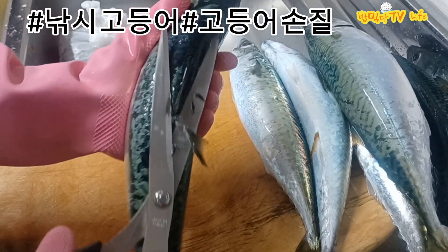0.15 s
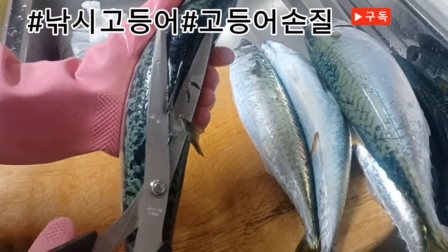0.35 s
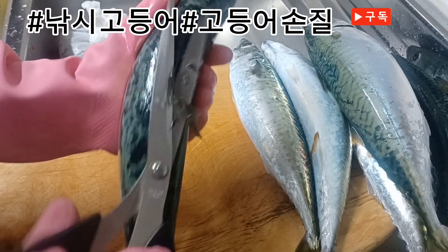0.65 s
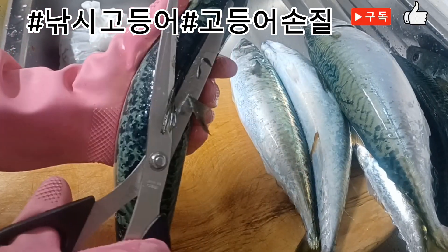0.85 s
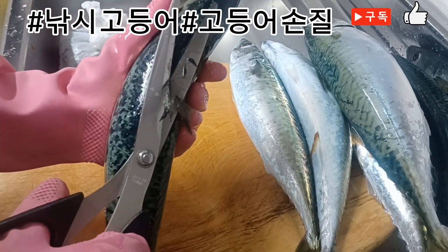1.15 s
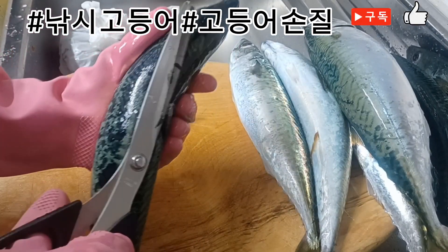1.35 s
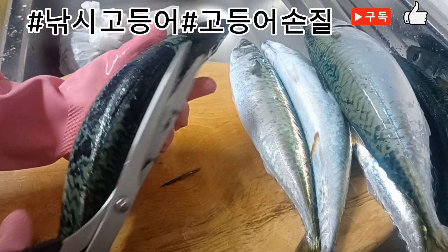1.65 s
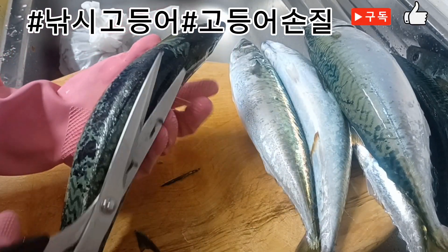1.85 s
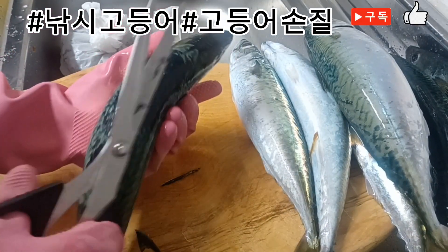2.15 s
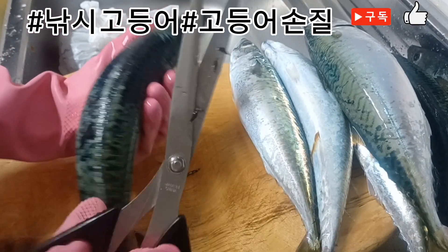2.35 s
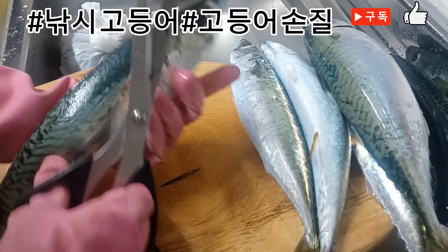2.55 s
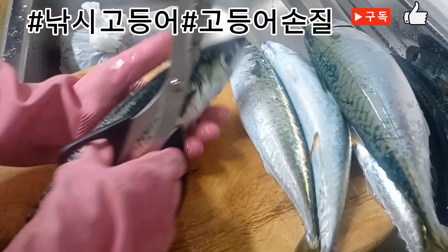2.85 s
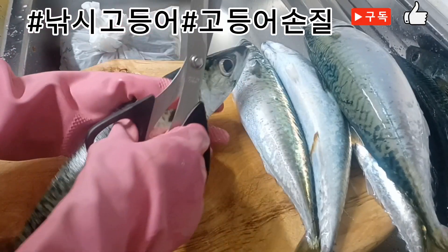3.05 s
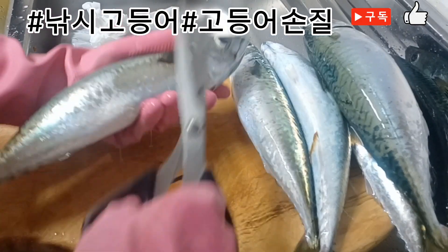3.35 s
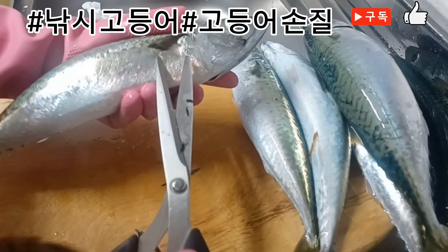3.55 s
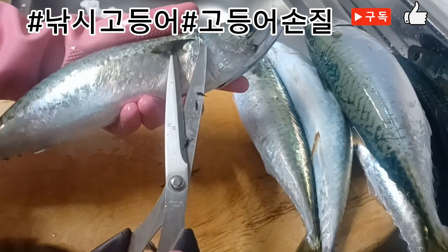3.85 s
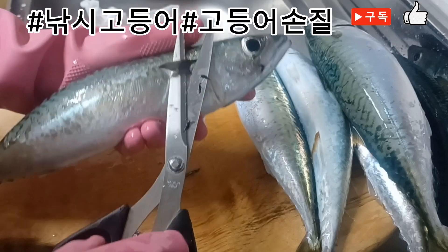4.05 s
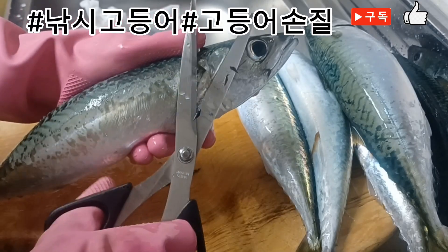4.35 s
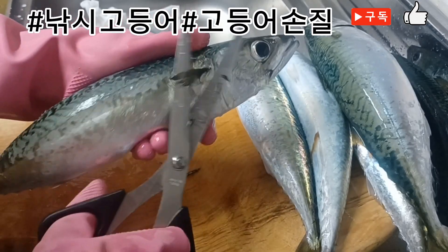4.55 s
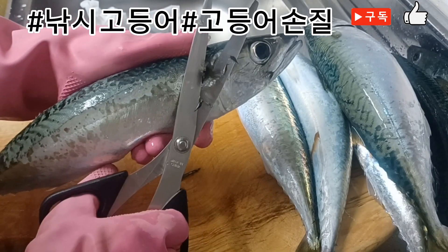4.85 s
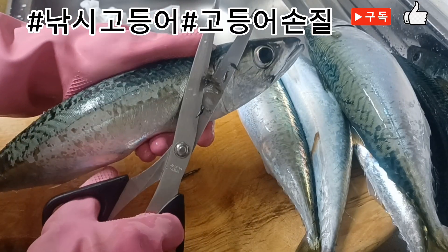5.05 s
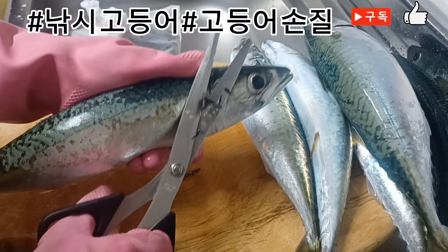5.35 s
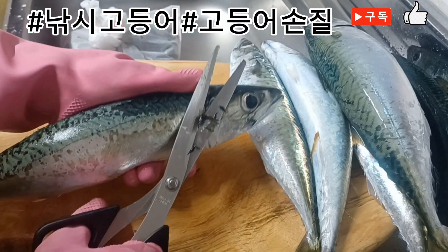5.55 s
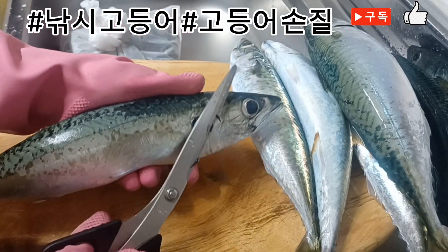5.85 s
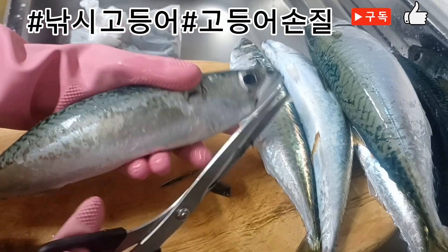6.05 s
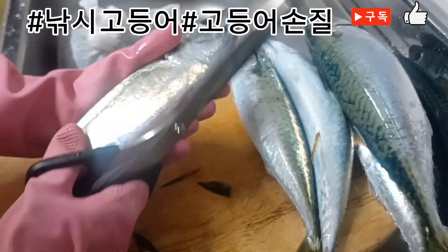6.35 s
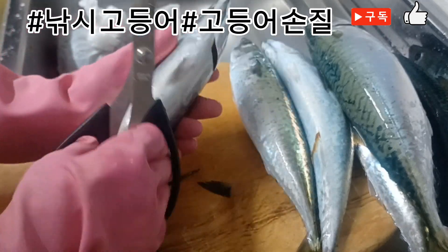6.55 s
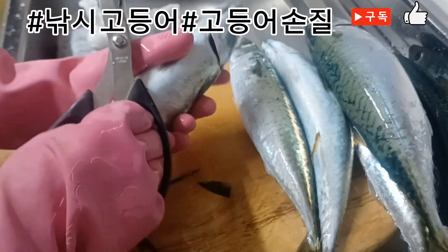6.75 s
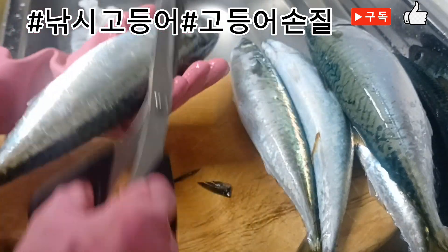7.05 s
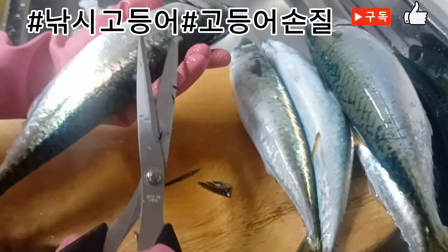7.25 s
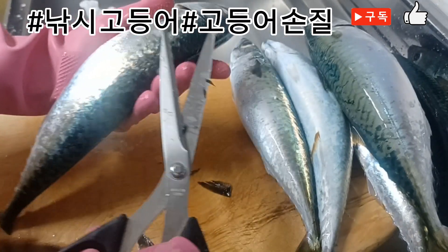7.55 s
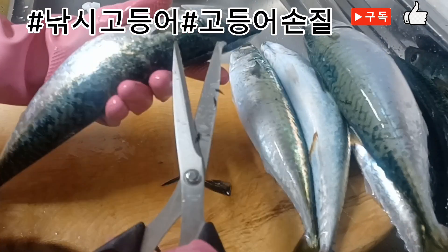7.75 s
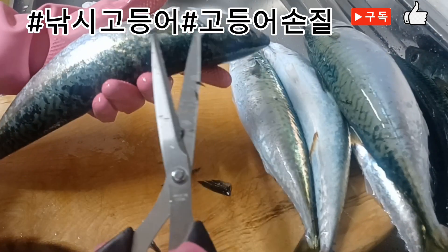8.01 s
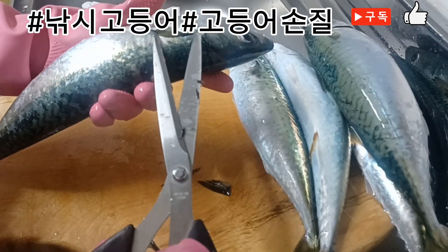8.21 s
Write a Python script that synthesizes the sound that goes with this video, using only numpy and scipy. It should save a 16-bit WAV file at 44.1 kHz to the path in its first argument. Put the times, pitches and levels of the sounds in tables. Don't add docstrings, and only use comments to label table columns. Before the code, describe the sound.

Close stereo pickup in a small quiet kitchen. Scissors crackle through fish fin rays, ending in hard snips with a metallic clink and soft board thuds. Wet rubber gloves then rustle, creak and peel as the fish is turned. A second run of gritty crackles builds to one loud, sharp snip, followed by more slippery handling and light smacks.

```python
import sys
import numpy as np
from scipy import signal
from scipy.fft import rfft, irfft, next_fast_len
from scipy.io import wavfile
from scipy.ndimage import uniform_filter1d

SR = 44100
rng = np.random.default_rng(int(sys.argv[2]) if len(sys.argv) > 2 else 0)


def transcribe(u):
    v = np.clip(np.atleast_2d(u).T, -1, 1)
    q = np.round(v * 32767).astype(np.int16)
    wavfile.write(sys.argv[1], SR, q)


def volts(x):
    e = np.asarray(x, float) / 20
    return 10 ** e


N = 369558

# f/Hz, level/dB
AIR = [(40, -37), (70, -15), (104, -0.5), (165, -12.5), (240, 1.5), (440, -9.5), (580, -3.5), (800, -2),
       (950, -9.5), (2500, -12), (5000, -8.5), (8300, -13), (12800, -14.5), (18000, -5)]
AIR_DB = -60.5
HUM_HZ, HUM_DB = 793, -74
KITCHEN_T60_S, WALL_CUT_HZ, KITCHEN_DB = 0.29, 8200, -12.5

# f/Hz, likeness/0-1
LIKENESS = [(60, 1), (250, 0.65), (600, 0.42), (1500, 0.027), (4000, 0.059), (12000, 0.027)]
# f/Hz, left minus right/dB
LEAN = [(60, -18.5), (250, -0.5), (1000, -0.8), (4000, -2.5), (12000, -3)]

# middle t/s, half length/s, rub level/dB, wetness/dB
SLIDES = [(0.18, 0.1, -78, 25), (0.473, 0.037, -68.5, 15), (0.731, 0.061, -67.5, 13),
          (1.368, 0.081, -59.5, -4), (1.736, 0.089, -64.5, 2.5), (1.943, 0.091, -59, -26),
          (2.387, 0.05, -55.5, -17), (2.59, 0.084, -65, 5), (2.879, 0.1, -56.5, -5),
          (3.071, 0.072, -56, -2), (3.21, 0.11, -59, -22), (3.63, 0.15, -59.5, -3.5),
          (3.923, 0.26, -67.5, 0.5), (4.287, 0.036, -54, -4.5), (4.63, .08, -62.5, 1),
          (4.782, 0.034, -62.5, -11), (4.977, 0.058, -67.5, 10.5), (5.25, 0.14, -57.5, -2.5),
          (5.467, 0.029, -67, 8), (5.85, 0.037, -46.5, -5.5), (6.125, 0.23, -56, -9.5),
          (6.47, 0.17, -53, -3.5), (6.821, 0.11, -56.5, -3), (6.977, 0.045, -61.5, -2),
          (7.19, 0.088, -58, -9), (7.355, 0.033, -59, -3), (7.6, 0.24, -68.5, -3.5),
          (7.89, 0.16, -56.5, -5.5), (8.102, 0.051, -55.5, -4.5), (8.298, 0.069, -58, 4)]
# middle t/s, half length/s, creak level/dB
SQUEEZES = [(0.018, 0.086, -63), (0.23, 0.13, -64), (0.5, 0.068, -63.5), (.85, 0.12, -69),
            (1.382, 0.086, -60.5), (1.76, 0.12, -69), (1.995, 0.02, -62), (2.155, 0.028, -59),
            (2.36, 0.066, -61.5), (2.64, 0.22, -64.5), (2.87, 0.058, -60), (3.187, 0.15, -56),
            (3.53, 0.1, -58.5), (3.793, 0.16, -61.5), (4.347, 0.061, -62), (4.644, 0.1, -63.5),
            (4.91, 0.12, -66.5), (5.15, 0.13, -55.5), (5.423, 0.15, -61.5), (5.855, 0.11, -60.5),
            (6.224, 0.22, -59.5), (6.485, 0.23, -61), (6.894, 0.1, -61), (7.216, 0.12, -59),
            (7.362, 0.019, -62), (7.546, 0.14, -68), (7.9, 0.13, -61), (8.075, 0.02, -67.5),
            (8.283, 0.094, -62.5)]
# f/Hz, level/dB
WET = [(4000, -9), (6000, 9), (8500, 7.5), (10500, 0.5), (12500, 8.5), (15000, -4), (18000, -27)]
# f/Hz, level/dB
RUB = [(700, -13), (1200, -4.5), (1800, 3.5), (2600, 2), (4500, -1.5), (6500, -18.5), (9000, -8),
       (14000, -9.5), (18000, -4)]
# f/Hz, level/dB
CREAK = [(120, -38), (175, -9), (240, -2.5), (375, 2), (460, -1.5), (590, 7), (850, -3), (1290, -4.5),
         (2500, -19), (5000, -33)]
FADE_DB = 8
REST_RUB_DB, REST_WET_DB, REST_CREAK_DB = -70, -72, -73
SHAKE_REST_DB, SHAKE_REL_DB, SHAKE_LINGER_S = -77.5, -12.5, 0.089
PATCH_DB, PATCH_RATE_HZ = 2.62, 20.0

# t/s, peak level/dB, centre f/Hz, t60/s
SMACKS = [(0.6534, -53, 6080, 0.06), (0.7744, -47, 1890, 0.068), (1.6394, -45, 5980, 0.06),
          (1.6735, -49, 5330, 0.06), (1.7194, -48, 5820, 0.06), (1.8594, -50, 1980, 0.06),
          (2.2418, -47, 4340, 0.06), (2.2972, -52, 5330, 0.06), (2.599, -46, 5170, 0.052),
          (2.997, -43, 6830, 0.06), (3.2894, -52, 1690, 0.06), (3.4161, -42, 2080, 0.06),
          (3.4844, -46, 1780, 0.052), (3.53, -43, 3560, 0.06), (3.7389, -45, 3350, 0.06),
          (3.7638, -40, 4460, 0.055), (3.8277, -48, 4240, 0.073), (3.9055, -45, 4840, 0.06),
          (4.019, -47, 3950, 0.06), (4.2994, -49, 3670, 0.053), (4.3396, -44, 2070, 0.077),
          (4.399, -46, 1770, 0.068), (4.5236, -46, 4470, 0.06), (6.03, -49, 1840, 0.06),
          (6.127, -40.5, 5680, 0.06), (6.1674, -46, 1850, 0.06), (6.3525, -41, 4650, 0.066),
          (6.3794, -47, 1680, 0.06), (6.447, -32, 1970, 0.06), (6.4694, -43, 2510, 0.06),
          (6.5294, -50, 3540, 0.06), (6.5697, -44, 2030, 0.065), (7.7503, -47, 4970, 0.06),
          (7.9094, -41, 2550, 0.078), (8.0193, -47, 1710, 0.06), (8.0711, -38.5, 2240, 0.06),
          (8.2344, -46, 4680, 0.06), (8.26, -43, 4680, 0.066), (8.298, -36.5, 5040, 0.054)]
SMACK_SWELL_S = 0.0024

# t/s, peak level/dB, board f/Hz, t60/s, table share/dB
THUDS = [(0.167, -51.5, 366, 0.18, -15), (0.543, -47, 557, 0.067, -4), (0.731, -44, 376, 0.11, -29),
         (0.745, -47, 375, 0.077, -24), (0.916, -42, 286, 0.094, -30), (1.008, -46.5, 215, 0.1, -10),
         (1.154, -33.5, 275, 0.047, -19), (1.304, -35.5, 270, 0.089, -10), (2.115, -49.5, 592, 0.12, -27),
         (2.62, -37.5, 359, 0.072, -0.5), (2.66, -40.5, 280, 0.071, -12), (2.709, -47, 568, 0.09, 0.5),
         (3.474, -57, 298, 0.062, 8), (5.052, -49.5, 568, 0.24, -20), (5.158, -39.5, 575, 0.093, -31),
         (5.314, -37, 570, 0.044, -35), (5.805, -29.5, 290, 0.067, -6), (5.806, -35.5, 803, 0.047, -25),
         (5.834, -32, 212, 0.056, 5), (5.842, -45.5, 300, 0.2, -23), (6.281, -50.5, 295, 0.088, 2.5),
         (6.568, -54.5, 383, 0.13, 5), (7.168, -56, 293, 0.052, 1), (7.218, -49.5, 387, 0.13, -3),
         (7.854, -61.5, 583, 0.1, 12)]
# f/Hz, t60/s, level/dB
TABLE = [(103, 0.19, -1), (76, 0.2, -9.5), (119, 0.4, -19)]
TABLE_LAG_S = 0.0044

# t/s, level/dB
CLINKS = [
    (1.1573, -45),
    (1.307, -42),
    (5.811, -47),
]
# f/Hz, level/dB, t60/s
STEEL = [(3540, 10, .09), (3980, -3, 0.096), (4020, -23, 0.073), (3880, 14, .08), (4400, -4, 0.061),
         (4700, 9, 0.04), (5150, -14, 0.045), (3200, -6, 0.06), (7200, 17.5, 0.028)]
RATTLE = 0.56

# t/s, peak level/dB, centre f/Hz, t60/s
SNAPS = [(0.0438, -55, 12900, 0.034), (0.0614, -45, 14100, 0.04), (0.0874, -39, 13000, 0.04),
         (0.172, -44, 13600, 0.037), (0.2299, -48, 11500, 0.027), (0.2388, -38, 11700, 0.03),
         (0.2519, -41, 13900, 0.033), (0.3691, -45.5, 6050, 0.03), (0.3919, -47, 11400, 0.035),
         (0.4704, -37, 13000, 0.045), (1.274, -45, 5740, 0.04), (2.9442, -34.5, 2550, 0.037),
         (3.2226, -34, 1780, 0.045), (4.9008, -47, 14900, 0.04), (4.9352, -37.5, 12300, 0.04),
         (4.9774, -44, 12100, 0.036), (5.0034, -43, 3920, 0.04), (5.0979, -33.5, 7230, 0.045),
         (5.1024, -35, 10100, 0.055), (5.1749, -37, 11800, 0.04), (5.2724, -37, 4640, 0.022),
         (5.3684, -35, 12400, 0.04), (5.453, -39, 12900, 0.04), (5.4944, -40, 4500, 0.04),
         (5.8037, -20, 12700, 0.016), (5.8159, -15, 5100, 0.022), (6.6094, -38, 5070, 0.04),
         (6.9544, -42, 11200, 0.04), (6.9994, -50, 3860, 0.04), (7.0529, -46, 3640, 0.047),
         (7.2005, -45, 4960, 0.04), (7.2294, -44, 1780, 0.043), (7.3552, -44, 3120, 0.04),
         (7.4679, -43, 2930, 0.065), (7.5542, -41, 3720, 0.045), (7.6834, -42, 1760, 0.057)]
SNAP_SWELL_S = 0.00048
SNAP_WIDTH, SNAP_DB, SNAP_BROAD = 0.77, -10, 0.94

# t/s, peak level/dB
CRACKS = [(.4475, -34), (.548, -31), (.9135, -21), (1.015, -33), (1.1572, -28), (4.135, -45), (5.028, -42),
          (5.0895, -36), (5.184, -34), (5.2325, -36), (5.294, -29), (5.377, -33), (5.416, -39),
          (5.6805, -36), (8.108, -41), (8.299, -41)]
CRACK_LOW_HZ, CRACK_HIGH_HZ = 3200, 14500

# t/s, peak level/dB, thickness/dB, t60/s
RAYS = [(.0707, -34, -37, 0.076), (.1321, -34, -42, 0.16), (0.192, -36, -26, 0.088),
        (0.253, -51, -11, 0.17), (0.408, -40, -22, 0.056), (0.445, -31.5, -48, 0.044),
        (0.5456, -28, -22.5, 0.046), (0.9122, -19, -33, 0.035), (0.9166, -37, -11, 0.016),
        (1.0135, -29, -19, 0.051), (1.1555, -23, -19.5, 0.026), (4.058, -46, -16, 0.31),
        (4.134, -33.5, -21.5, 0.071), (4.2562, -29.5, -23.5, 0.056), (4.272, -41.5, -11.5, 0.037),
        (4.952, -40, -15.5, 0.088), (4.9927, -38, -24, .05), (5.026, -37.5, -16, 0.081),
        (5.055, -39.5, -15.5, 0.13), (5.089, -34.5, -21.5, 0.05), (5.183, -30.5, -19.5, 0.071),
        (5.232, -28, -26, 0.051), (5.248, -33, -17.5, 0.086), (5.294, -29, -17.5, 0.059),
        (5.357, -32.5, -17.5, 0.081), (5.377, -34, -18, 0.076), (5.4876, -33, -18.5, 0.084),
        (5.6795, -32.5, -24.5, 0.059), (5.6923, -40.5, -15, 0.064), (5.74, -36.5, -17.5, 0.093)]
# t/s, peak level/dB, thickness/dB
TICKS = [(.735, -59, -12), (1.082, -44, -9), (.4235, -44, -30), (1.397, -46.5, -10.5), (1.587, -58, -6),
         (1.76, -44.5, -15.5), (1.909, -51, -9), (1.9499, -48.5, -10.5), (1.9803, -44.5, -14.5),
         (2.0734, -38, -15), (2.119, -47.5, -9), (2.389, -48, -17), (2.475, -46.5, -12), (2.686, -43, -17),
         (2.9436, -37.5, -18), (3.2227, -66, -21), (3.2544, -48, -21), (3.557, -45.5, -13.5),
         (3.6006, -43, -19), (3.706, -46, -15), (3.7603, -48.5, -9), (3.972, -43, -22.5),
         (4.5517, -57.5, -4.5), (4.573, -48, -10.5), (4.6595, -39, -18.5), (5.6365, -44.5, -11.5),
         (7.9636, -39.5, -16.5), (8.107, -41, -11.5), (8.182, -39.5, -14)]
# t/s, peak level/dB, thickness/dB
PEELS = [(2.193, -43.5, -14.5), (2.352, -52, -8), (2.547, -36.5, -15), (2.824, -48, -9.5),
         (3.0848, -48.5, -7.5), (3.16, -39, -16), (3.316, -47.5, -12), (3.5046, -49, -8.5),
         (3.8492, -43, -14), (4.598, -46.5, -16), (4.719, -44.5, -16), (4.85, -47.5, -14.5),
         (4.9207, -51, -12.5), (5.417, -37.5, -16), (5.979, -41.5, -19.5), (6.089, -42.5, -11),
         (6.2083, -47, -21), (6.266, -45, -11.5), (6.33, -43, -15.5), (6.422, -39, -13.5), (6.669, -54, -8),
         (6.75, -39, -18), (6.846, -39, -14), (7.159, -49, -19.5), (7.7818, -36.5, -17), (7.8402, -47, -14),
         (8.21, -41, -14), (8.295, -46, -10.5)]
# t/s, peak level/dB, thickness/dB, swell/s, t60/s
SHEARS = [
    (.066, -37.5, -27, 0.03, 0.14),
    (0.44, -38, -22, 0.0055, 0.37),
    (1.305, -21, -19, 0.0078, 0.067),
    (5.16, -37, -15, 0.015, .052),
    (5.784, -34.5, -19, 0.0011, 0.08),
    (5.799, -10, -20.5, 0.0074, 0.035),
]
# t/s, peak level/dB, crunch/dB, knock/dB, swell/s, t60/s
CLAP = (5.8097, -16, -13, -21, .0005, .03)
# f/Hz, width/Hz, level/dB
BLADES = [(1286, 21, -4), (3230, 190, 1.5), (3440, 33, -25), (4760, 360, 2), (5470, 550, -27),
          (7700, 180, 6.5), (11900, 570, -14), (11500, 35, -16), (13300, 150, -10), (15400, 1300, 0)]
RAY_KNOCK_DB, TICK_KNOCK_DB, PEEL_KNOCK_DB, SHEAR_KNOCK_DB = -8, -3, -3.5, -9
TICK_T60_S, PEEL_T60_S = 0.048, 0.11
TICK_SWELL_S, PEEL_SWELL_S = 0.0069, 0.0089
RAY_EDGE_DB, GLOVE_EDGE_DB = -1.2, 2.5
CUT_ALIKE = 0.049
# band edges f/Hz, then left minus right/dB
CUT_BANDS = ((9300, 17700), (2900, 6370), (880, 2830))
CUT_LEAN_DB = (-4, -2, 5.5)

DIP_HZ, DIP_WIDTH_HZ, DIP_SHARE = 8300, 1800, .6
PORT_LAG, LOW_CUT_HZ, TOP_HZ = 4, 54, 15700


def at_hz(points, hz):
    f, value = np.transpose(points)
    return np.interp(np.log(hz), np.log(f), value)


def rms_one(x):
    return x / np.sqrt(np.mean(x ** 2) + 1e-20)


def sides(lean_db):
    return volts(lean_db / 2 * np.array([[1], [-1]]))


def widen(mid, side, alike):
    return np.sqrt(1 + alike) * mid + np.sqrt(1 - alike) * side * [[1], [-1]]


def drift(rate):
    r = np.exp(-80 * np.pi * rate / SR)
    noise = rng.standard_normal(N // 40 + 2002)
    slow = signal.lfilter([1], [1, -2 * r, r * r], noise)[2000:]
    return np.interp(np.arange(N) / 40, np.arange(len(slow)), rms_one(slow))


def band(x, low_hz, high_hz):
    return signal.sosfilt(signal.butter(2, [low_hz, high_hz], "band", fs=SR, output="sos"), x)


def resonance(x, hz, width_hz):
    r = np.exp(-np.pi * width_hz / SR)
    rise = np.array([1, 0, -1]) * (1 - r * r) / 2
    return signal.lfilter(rise, [1, -2 * r * np.cos(2 * np.pi * hz / SR), r * r], x)


def grit(grain_db, hold):
    sizes = volts(grain_db * np.minimum(rng.exponential(1, N // hold + 1), 4))
    return rms_one(np.repeat(sizes, hold)[:N] * rng.standard_normal((2, N)))


def spread(white, spectrum):
    size = next_fast_len(N)
    hz = np.maximum(np.arange(size // 2 + 1) * SR / size, 1)
    mid, side = rfft(white, size) * volts(at_hz(spectrum, hz))
    both = sides(at_hz(LEAN, hz)) * widen(mid, side, at_hz(LIKENESS, hz))
    return rms_one(irfft(both, size)[:, :N])


def air():
    turn = 2 * np.pi * HUM_HZ * np.arange(N) / SR + .5 * drift(4)
    hum = volts(HUM_DB + 1.2 * drift(3.0)) * np.sqrt(2) * np.sin(turn)
    tone = spread(rng.standard_normal((2, N)), AIR)
    return volts(AIR_DB + 0.47 * drift(0.33)) * tone + hum


def kitchen(x):
    size = next_fast_len(N + SR)
    w = 2 * np.pi * np.arange(size // 2 + 1) / size
    dull = 1 / np.sqrt(1 + (w * SR / (2 * np.pi * WALL_CUT_HZ)) ** 2)
    walls = np.zeros((2, len(w)), complex)
    lags = (rng.uniform(.004, .02, 12) * SR).astype(int)
    for k, lag in enumerate(lags):
        loop = dull * volts(-60 * lag / SR / KITCHEN_T60_S) * np.exp(-1j * w * lag)
        walls[k % 2] += loop / (1 - loop) * (-1) ** (k // 2)
    return irfft(rfft(x, size) * walls, size)[:, :N]


def gestures(s, half, peak_db, rest_db):
    t = np.arange(0, N, 64) / SR
    away = (t - s[:, None]) / half[:, None]
    power = volts(2 * (peak_db[:, None] - FADE_DB * away ** 2)).sum(axis=0)
    return np.interp(np.arange(N) / SR, t, np.sqrt(power + volts(2 * rest_db)))


def patchy(x):
    out = x
    for low in 500 * 2 ** np.arange(5):
        out = out + (volts(PATCH_DB * drift(PATCH_RATE_HZ)) - 1) * band(x, low, 2 * low)
    return out


def table_shake(squeeze):
    shake = rng.standard_normal(N)
    upper = resonance(resonance(shake, 106, 40), 106, 40)
    rumble = rms_one(upper + .25 * resonance(shake, 68, 25))
    keep = np.exp(-1 / (SHAKE_LINGER_S * SR))
    settling = signal.lfilter([1 - keep], [1, -keep], squeeze)
    return (volts(SHAKE_REST_DB) + volts(SHAKE_REL_DB) * settling) * rumble


def handling():
    s, half, rub_db, wetness_db = np.transpose(SLIDES)
    squeeze = gestures(*np.transpose(SQUEEZES), REST_CREAK_DB)
    slips = volts(1.2 * drift(18) + 1.5 * drift(80))
    skin = grit(grain_db=-1.0, hold=24)
    wet = gestures(s, half, rub_db + wetness_db, REST_WET_DB) * volts(0.28 * drift(11.0)) * spread(skin, WET)
    rub = gestures(s, half, rub_db, REST_RUB_DB) * volts(1.25 * drift(45)) * spread(skin, RUB)
    creak = squeeze * volts(2.1 * drift(19.7)) * spread(grit(grain_db=0.5, hold=80), CREAK)
    return slips * patchy(wet + rub) + np.sqrt(slips) * creak + table_shake(squeeze)


def thuds():
    out = np.zeros(N)
    slap = rms_one(band(rng.standard_normal(N), 150, 640))
    for s, peak_db, hz, t60, share_db in THUDS:
        at = round(s * SR)
        t = np.arange(min(SR // 3, N - at)) / SR
        ring = np.sin(2 * np.pi * hz * t)
        blow = (ring + 0.53 * slap[at:at + len(t)]) * volts(-1.0 - 60 * t / t60)
        late = np.maximum(t - TABLE_LAG_S, 0)
        for mode_hz, mode_db, mode_t60 in [(f, db, d) for f, d, db in TABLE]:
            blow += np.sin(2 * np.pi * mode_hz * late) * volts(share_db + mode_db - 60 * t / mode_t60)
        out[at:at + len(t)] += volts(peak_db) * blow * (1 - np.exp(-t / 0.0062))
    return out


def clinks():
    out = np.zeros(N + SR)
    t = np.arange(SR // 4)[:, None] / SR
    hz, db, t60 = np.transpose(STEEL)
    for s, peak_db in CLINKS:
        luck = rng.standard_normal((2, len(STEEL)))
        shake = rng.standard_normal((2, len(t), len(STEEL)))
        for _ in range(2):
            shake = uniform_filter1d(shake, size=150, axis=1)
        shake = rms_one(shake)
        turn = 2 * np.pi * hz * t + 2 * luck[1]
        rough = (1 - RATTLE + RATTLE * shake[0]) * np.sin(turn) + RATTLE * shake[1] * np.cos(turn)
        rings = volts(peak_db + db + 2.5 * luck[0] - 60 * t / t60) * rough
        at = round(s * SR)
        out[at:at + len(t)] += rings.sum(axis=1) * np.minimum(t[:, 0] / 0.0018, 1)
    return out[:N]


def snaps(rows, swell):
    out = np.zeros((2, N + SR))
    t = np.arange(SR // 10) / SR
    for s, peak_db, hz, t60 in rows:
        puff = rng.standard_normal((3, len(t)))
        lumps = np.repeat(puff[2, ::20], 20)[:len(t)]
        lumpy = puff[:2] * volts(2.2 * lumps)
        tone = rms_one(resonance(lumpy, hz, SNAP_WIDTH * hz)) + SNAP_BROAD * band(lumpy, 2100, 16000)
        outline = volts(peak_db + SNAP_DB - 60 * t / t60) * np.minimum(t / swell, 1)
        at = round(s * SR)
        out[:, at:at + len(t)] += outline * tone
    return out[:, :N]


def cracks():
    clicks = np.zeros(N) + 1e-18
    for s, peak_db in CRACKS:
        clicks[round(s * SR)] = volts(peak_db + 8)
    return band(clicks, CRACK_LOW_HZ, CRACK_HIGH_HZ) * sides(-3)


def breaks():
    rows = []
    for s, db, thick, t60 in RAYS:
        rows.append((s, db, thick, thick + RAY_KNOCK_DB, .003, t60, RAY_EDGE_DB))
    for s, db, thick in TICKS:
        rows.append((s, db, thick, thick + TICK_KNOCK_DB, TICK_SWELL_S, TICK_T60_S, GLOVE_EDGE_DB))
    for s, db, thick in PEELS:
        rows.append((s, db, thick, thick + PEEL_KNOCK_DB, PEEL_SWELL_S, PEEL_T60_S, GLOVE_EDGE_DB))
    return rows


def bursts(rows):
    out = np.zeros((3, N))
    for s, peak_db, crunch_db, knock_db, swell, t60 in rows:
        at = round(s * SR)
        t = np.arange(min(int((swell + t60) * SR), N - at)) / SR
        shape = np.minimum(t / swell, 1) * volts(-60 * np.maximum(t - swell, 0) / t60)
        levels_db = np.array([[-10.0], [crunch_db + 6.0], [knock_db + 5.5]])
        out[:, at:at + len(t)] += volts(peak_db + levels_db) * shape
    return out


def scissors():
    rows, ticks = [CLAP], []
    for s, db, crunch, knock, swell, t60, edge in breaks():
        rows.append((s, db, crunch, knock, swell, t60))
        ticks.append((s + 0.00044, db + edge, crunch, knock, .0004, .01))
    for s, db, thick, swell, t60 in SHEARS:
        rows.append((s, db, thick, thick + SHEAR_KNOCK_DB, swell, t60))
    splinters = widen(*grit(grain_db=2.6, hold=16), CUT_ALIKE)
    steel = .6 * splinters
    for k, (hz, width, db) in enumerate(BLADES):
        steel = steel + volts(db) * (-1) ** k * resonance(splinters, hz, width)
    out = 0
    for outline, (low, high), lean_db in zip(bursts(rows + ticks), CUT_BANDS, CUT_LEAN_DB):
        out = out + outline * rms_one(band(steel, low, high)) * sides(lean_db)
    return out


def scene():
    gloves = handling() + snaps(SMACKS, SMACK_SWELL_S)
    blows = thuds()
    ringing = clinks() * volts(np.array([[1.5], [-6.0]]))
    cuts = scissors() + snaps(SNAPS, SNAP_SWELL_S) + cracks()
    echoes = kitchen(cuts.mean(axis=0) + band(blows, 142, 2200))
    return air() + volts(KITCHEN_DB) * echoes + gloves + blows + ringing + cuts


def roll_off(x):
    return signal.sosfilt(signal.butter(12, 16520, fs=SR, output="sos"), x)


def record(dry):
    right = np.r_[np.zeros(PORT_LAG), dry[1, :-PORT_LAG]]
    heard = np.array([dry[0], right])
    heard = heard - DIP_SHARE * resonance(heard, DIP_HZ, DIP_WIDTH_HZ)
    heard = signal.sosfilt(signal.butter(6, LOW_CUT_HZ, "high", fs=SR, output="sos"), heard)
    mix = signal.sosfilt(signal.cheby2(14, 38, TOP_HZ, fs=SR, output="sos"), heard)
    return roll_off(mix)


dry = scene()
out = record(dry)
transcribe(out)
```